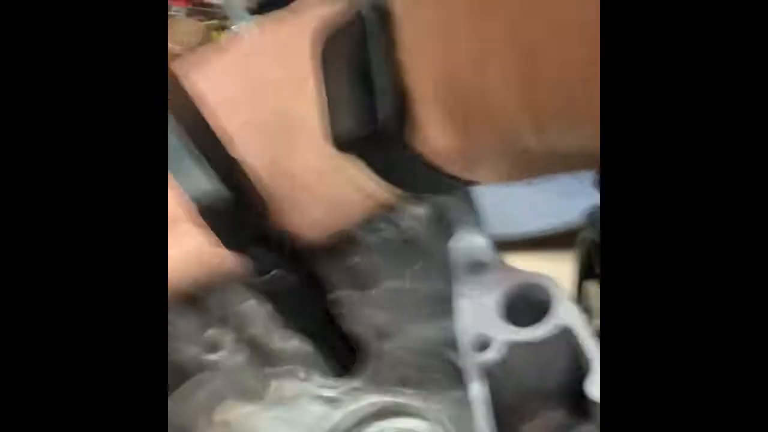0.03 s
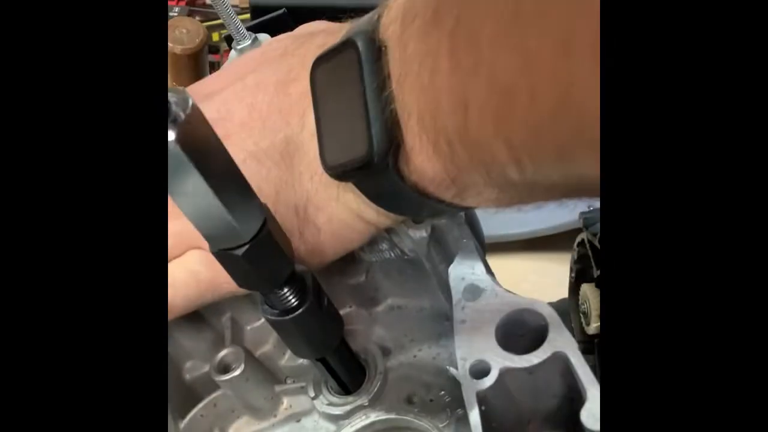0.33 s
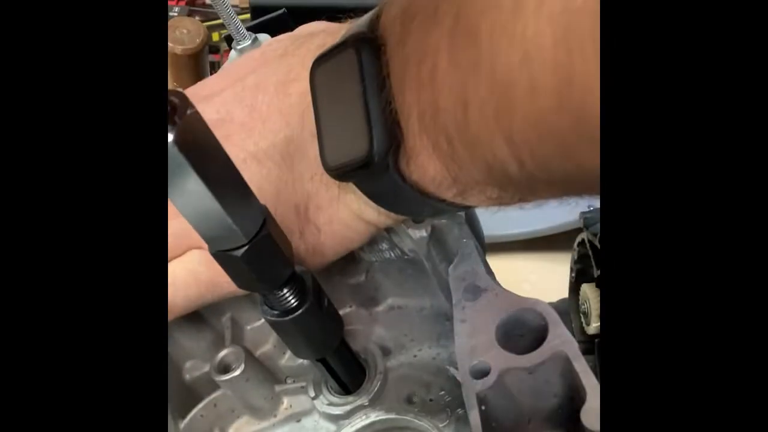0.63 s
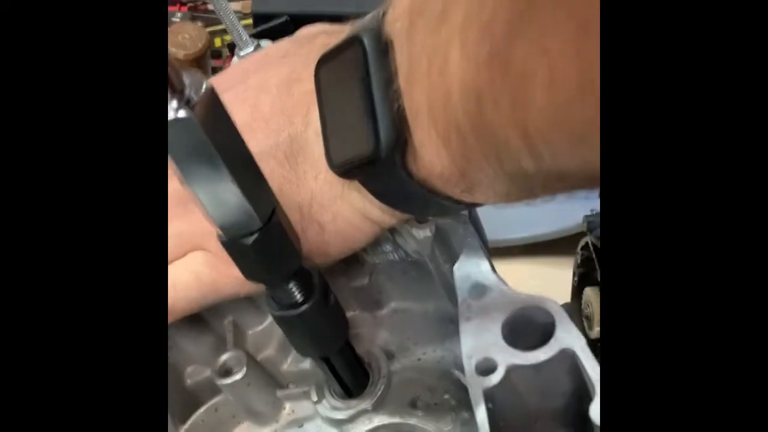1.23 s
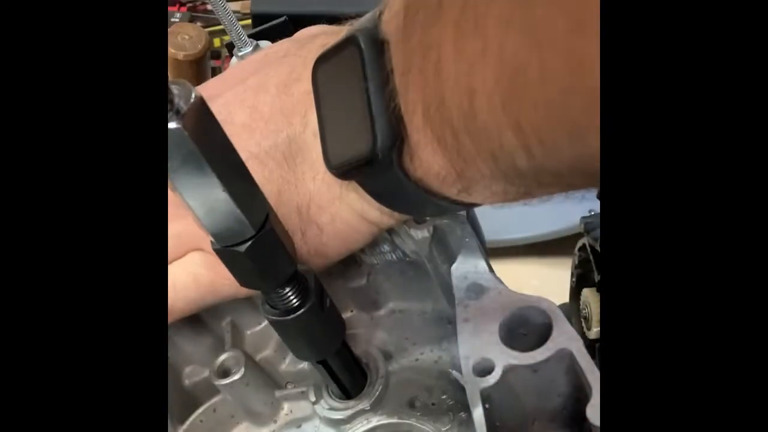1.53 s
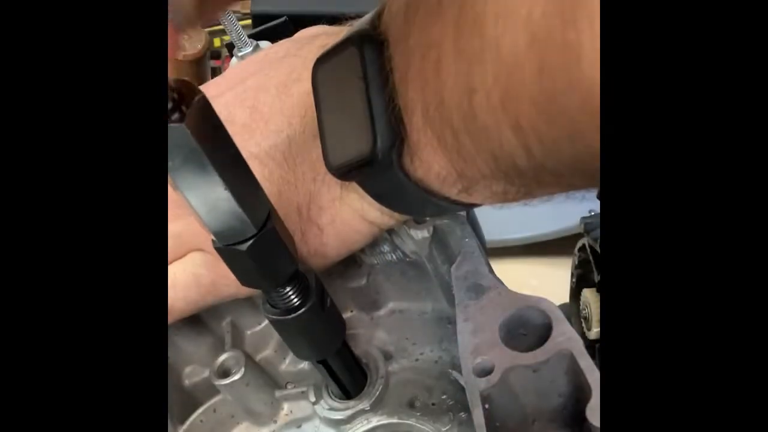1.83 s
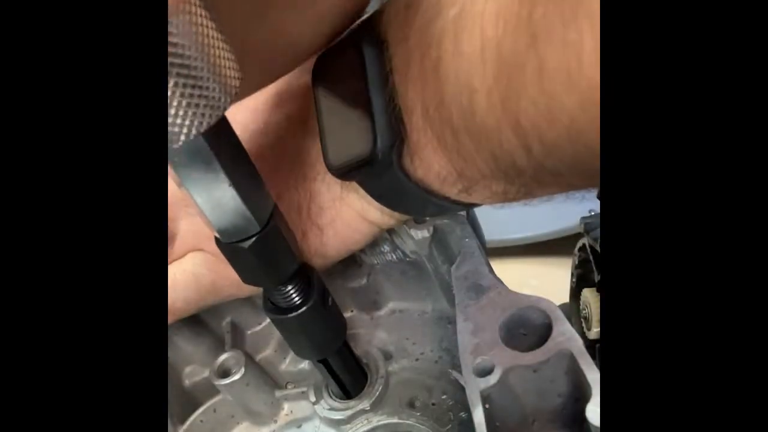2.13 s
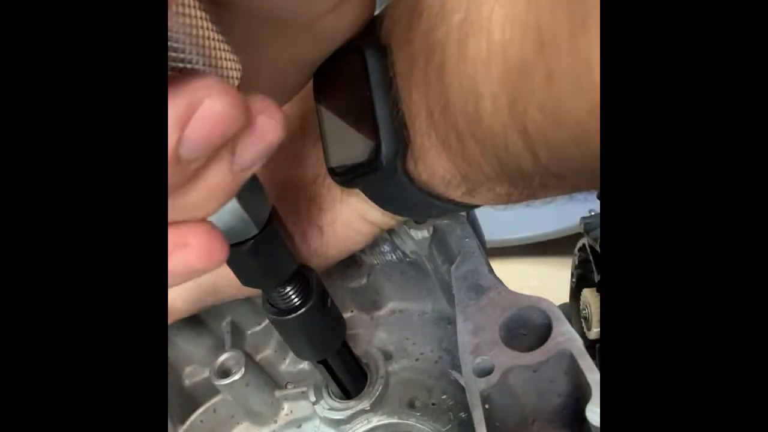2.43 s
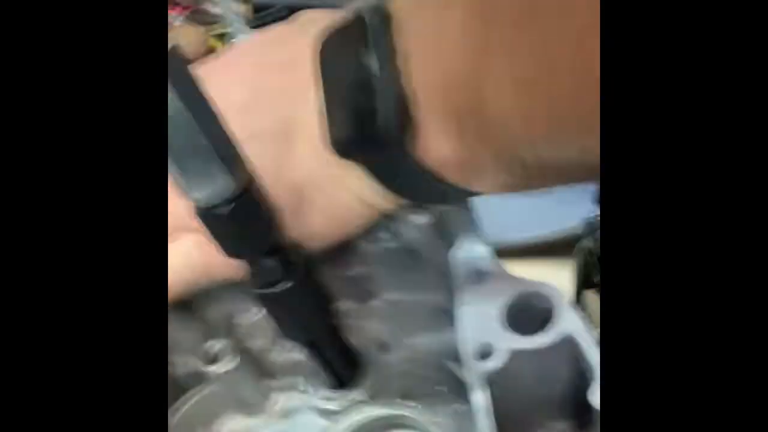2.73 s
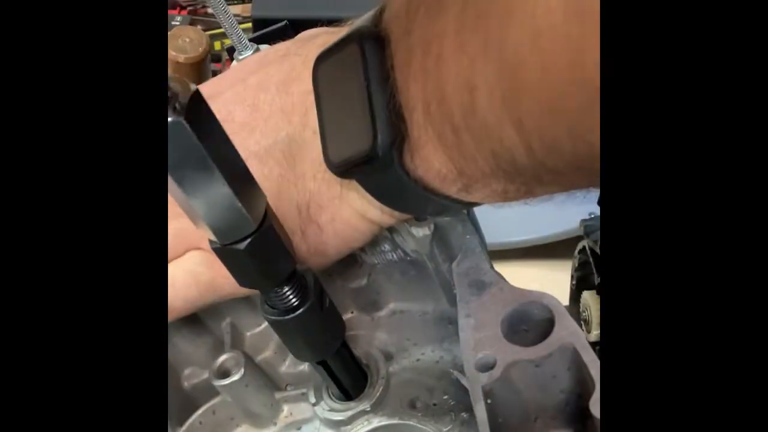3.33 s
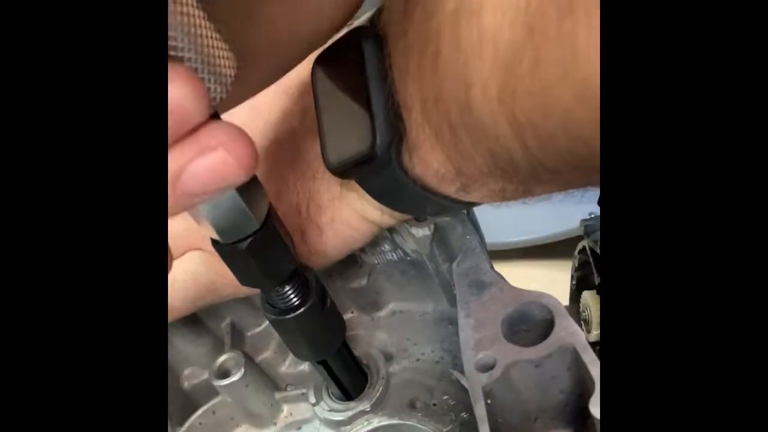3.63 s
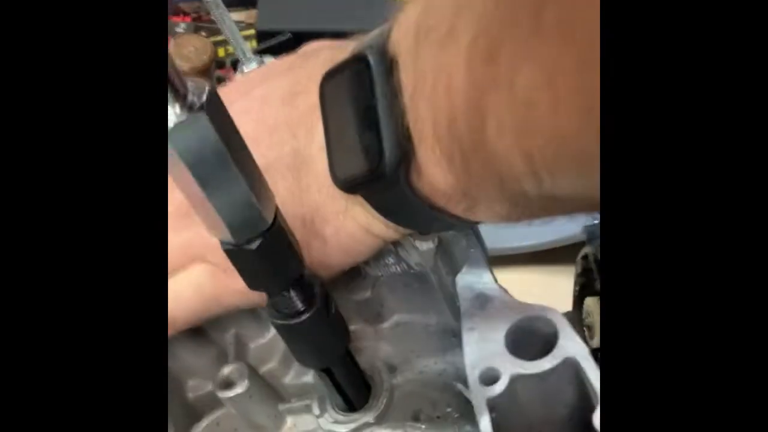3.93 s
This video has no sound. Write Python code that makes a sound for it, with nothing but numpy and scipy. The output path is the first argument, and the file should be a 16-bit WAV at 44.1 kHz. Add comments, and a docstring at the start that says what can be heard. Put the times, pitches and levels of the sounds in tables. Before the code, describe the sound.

Four loud metallic slide hammer blows, with rasping slides and lighter clacks between them.

```python
"""A slide hammer pulls at an aluminium engine case on a garage bench, close to the microphone.
The sound opens on a crash of the steel weight against the stop: the rod rings high, and the case
thuds and rocks on the bench. Then, three times, the weight slides back down with a hollow rasp,
lands with a clack, scrapes up its rod and crashes again.
Faint room noise and a short garage echo lie under it all."""
import sys
import numpy as np
from scipy import signal
from scipy.fft import rfft, irfft
from scipy.io import wavfile
from scipy.ndimage import uniform_filter1d

SR = 44100
rng = np.random.default_rng(int(sys.argv[2]) if len(sys.argv) > 2 else 0)


def unload_audio(sound):
    """Save the sound as a 16-bit wav file, at the path given as the first command line argument."""
    columns = np.transpose(np.atleast_2d(sound))
    # keep every value between -1 and 1, then stretch to whole-number steps
    steps = np.round(np.clip(columns, -1, 1) * 32767)
    wavfile.write(sys.argv[1], SR, steps.astype(np.int16))


N = 176400
T, HZ = np.arange(N) / SR, np.fft.rfftfreq(N, 1 / SR)

# how alike the two microphone openings hear a sound: f/Hz, likeness/0-1, left lead/rad
STEREO = [(60, 0.89, -0.43), (399.4, 0.86, -0.37), (830, 0.78, -0.15), (1990, 0.37, -1.6), (3900, 0, -1.6),
          (8000, 0.9, -0.57), (12000, 0.9, -0.5), (15000, 0.9, 0.49)]
# steady room noise: f/Hz, level/dB
ROOM_SPECTRUM = [(18, -44), (30, -14), (75, 1.5), (125, -4), (167, -7.5), (222, -12.5), (774, -36.5),
                 (15000, -44)]
# the garage's echo: f/Hz, time to fade by 60 dB/s
ECHO_TIMES = [(60, 0.62), (250, 0.6), (1000, 0.2), (4000, 0.45), (15000, 0.18)]
# path of a thin squeak: t/s, f/Hz, level/dB
SQUEAK_PATH = [(1.771, 10000, -91), (1.878, 11500, -76), (2.002, 13400, -87.5), (2.17, 11380, -76),
               (2.259, 10100, -80.5)]
# hands change grip and the case settles: t/s, level/dB, rise/s, fall/s
NUDGES = [(0.11, -34, 0.002, 0.014), (0.223, -46, 0.046, 0.026), (1.248, -54.5, 0.016, 0.1),
          (2.161, -42, 0.013, 0.016), (2.323, -49.5, 0.0079, 0.024), (2.97, -52, 0.023, 0.039)]
# tone of a nudge: f/Hz, level/dB
NUDGE_SPECTRUM = [(50, 0.5), (130, -2.5), (300, 1.5), (600, -0.5), (950, 3.5), (1350, -7.5), (1900, -22),
                  (2500, -10.5), (4200, -27.5), (12000, -36.5)]
# the weight taps rod and handle: t/s, level/dB, fall/s, treble tilt/dB per octave
CLICKS = [(.003, -20.5, 0.0022, 7.5), (.394, -40.5, 0.022, -2.5), (.504, -40, 0.0065, 1.5),
          (2.1508, -46, 0.0061, -2), (2.311, -63, 0.0081, -3), (2.7343, -28.5, 0.003, 7)]
# tone of a tap: f/Hz, level/dB
CLICK_SPECTRUM = [(29, -39), (50, -6.5), (258, -4), (520, -12.5), (863, 0), (1120, -15), (1300, -4),
                  (2160, -9), (3580, -3.5), (7210, -9), (7950, -15), (12000, -11.5), (16000, -31)]
# the weight slides down, one list a slide: t/s, hollow level/dB, rasp level/dB, hollow f/Hz
SLIDES = [
    [(0.5, -66, -49, 820), (0.572, -63, -54.5, 883), (0.61, -47, -49, 905), (0.656, -80, -62.5, 886),
     (0.692, -47, -56.5, 853), (0.708, -56, -60.5, 883), (0.792, -56, -66, 884), (0.82, -67, -58, 890)],
    [(1.39, -70, -68.5, 758), (1.484, -57.5, -54, 855), (1.58, -70, -51.5, 786), (1.66, -67.5, -55.5, 1020),
     (1.832, -43.5, -60.5, 890), (1.904, -56, -66, 874), (1.948, -40, -60, 904), (1.99, -52.5, -69, 880)],
    [(3.09, -73, -54, 772), (3.12, -55, -51, 766), (3.272, -62, -55, 788), (3.374, -57, -51, 895),
     (3.422, -60.5, -56.5, 920), (3.486, -49.5, -49.5, 850), (3.52, -53, -64, 845),
     (3.545, -41.5, -54, 891)],
]
# hollow resonances of a slide: multiple of the pitch, half width/Hz, level/dB
HOLLOW_TONES = [(1.0, 56.1, 1.5), (1.42, 60, -12)]
# higher resonances of a slide: f/Hz, width/Hz, level/dB
SQUEALS = [(1825, 180, -9), (2593, 480, -2), (5300, 400, -12)]
# tone of the sliding friction: f/Hz, level/dB
RASP_SPECTRUM = [(150, -21.5), (280, -2.5), (450, -18.5), (800, -5.5), (1100, -15.5), (1280, 3),
                 (1500, -20.5), (2650, -2.5), (3150, -17.5), (3800, -7), (6700, -25), (7500, -11.5),
                 (8800, -30.5), (10000, -17.5), (14000, -38)]
# the weight lands: t/s, level/dB
LANDINGS = [(0.8372, -29.5), (2.0078, -32.5), (3.5651, -30.5)]
# notes of the case when the weight lands: f/Hz, level/dB
KNOCK_TONES = [(215, -13.5), (660, -20.5), (885, -13), (1320, -14), (2315, -20)]
# the weight is pulled up or bounces back: t/s, level/dB, rise/s, fall/s, extra rod ring/dB
SCRAPES = [(0.225, -38, 0.08, 0.094, 0.5), (0.617, -63, 0.0079, 0.021, 9), (0.982, -37, 0.0061, 0.032, -26),
           (1.222, -36.5, 0.061, 0.038, 2), (2.702, -39, 0.0066, 0.02, -27), (2.956, -36, 0.052, 0.025, 2),
           (3.765, -36.5, 0.0095, 0.027, -37), (3.995, -38, 0.042, 0.058, -3)]
# tone of a scrape: f/Hz, level/dB
SCRAPE_SPECTRUM = [(88, -26.5), (150, -1.5), (611, -11.5), (860, -1.5), (1190, -18.5), (1770, -2.5),
                   (1940, -12.5), (2180, -10.5), (2630, -9), (3710, 2.5), (5020, -7.5), (6940, -9.5),
                   (7920, -9), (11600, -2.5), (12700, -6.5), (14000, -13.5)]
# the loose weight rattles on the rod: t/s, level/dB, fall/s
RATTLES = [(.1096, -35.5, .008), (0.208, -36, 0.0032), (.2165, -35, .006), (0.322, -49, 0.034),
           (0.485, -44, 0.011), (.608, -48, 0.0052), (1.144, -35, 0.0046), (1.182, -43, .004),
           (1.2226, -40.5, 0.012), (1.3148, -43.5, 0.037), (1.4072, -50, 0.0066), (1.698, -51.5, .012),
           (2.9494, -45, .007), (2.969, -54, 0.0058), (3.062, -45.5, 0.023), (3.376, -48.5, 0.0068)]
# notes of the steel rod and weight: f/Hz, level/dB, time to fade by 60 dB/s
ROD_TONES = [(1357, -15, .25), (2225, -13, .24), (3655, -21, .2), (12818, -20, .35), (14508, -10, .6),
             (15019, -7, .5), (15089, -8, .5), (15154, -3, .6), (15455, -3, .55)]
# the case jolts and drops back on the bench: t/s, level/dB, first f/Hz, last f/Hz, rise/s
THUDS = [(0.0192, -12.5, 497, 64.7, 0.0043), (0.043, -13, 76.4, 51.7, 0.0055),
         (0.0557, -8.5, 160, 43.4, 0.011), (1.04, -14.5, 473, 72.5, 0.0071), (1.07, -10, 162, 44, 0.011),
         (1.116, -19, 92, 48.3, 0.012), (2.7614, -6, 545, 63.7, 0.0059), (2.791, -11, 135, 45.5, 0.013),
         (2.836, -22.5, 92.5, 49.4, 0.012), (3.818, -11.5, 587, 61.5, 0.0055),
         (3.847, -9.5, 155, 41.5, 0.014), (3.892, -16, 94, 45.4, 0.01)]
# the weight hits the stop: t/s, level/dB, rise/s, fall/s, treble tilt/dB per octave
BLOWS = [(0.02, -12.5, 0.0053, 0.007, 1.5), (1.042, -10, 0.0067, 0.0077, 2.5),
         (2.7625, -14, 0.0067, 0.0094, 2), (3.819, -12.5, 0.0059, 0.01, 2.5)]
# tone of the crash: f/Hz, level/dB
CRASH_SPECTRUM = [(200, -1), (380, -2), (560, -9.5), (800, -9), (1200, -12), (1600, -17.5), (2700, -18.5),
                  (4200, -16.5), (6400, -21), (8000, -17), (9400, -32.5), (11900, -21.5), (13400, -35.5),
                  (15100, -25.5), (16000, -25.5)]
# tone of the shudder that follows it: f/Hz, level/dB
SHUDDER_SPECTRUM = [(250, 5.5), (450, -6.5), (750, -6.5), (1300, -9.5), (1850, -14), (2200, -6.5),
                    (3000, -21), (3700, -12.5), (5400, -19), (8000, -16), (12100, -18.5), (13400, -20.5),
                    (16000, -24)]

TAP_RISE_S = 0.0005


def amp(db):
    """Turns decibels into a number to multiply by."""
    return 10 ** (np.asarray(db) / 20)


def evened(x):
    """Scales a signal to an average strength (rms) of 1."""
    return x / np.sqrt(np.mean(x ** 2) + 1e-20)


def read(points, hz, column=1):
    """Looks up a table between its rows, on a log frequency scale."""
    table = np.array(points, float)
    return np.interp(np.log(hz + 1), np.log(table[:, 0] + 1), table[:, column])


def wander(span):
    """A smooth random curve that changes over about span steps."""
    fade = np.exp(-np.minimum((np.fft.rfftfreq(N) * span * 2) ** 2, 50))
    return evened(irfft(rfft(rng.standard_normal(N)) * fade, N))


def noise(gain):
    """Stereo noise with this gain at each frequency, partly alike on the left and right."""
    left, other = rfft(rng.standard_normal((2, N)))
    likeness = read(STEREO, HZ)
    lag = np.exp(-1j * read(STEREO, HZ, column=2))
    right = (likeness * left + np.sqrt(1 - likeness ** 2) * other) * lag
    return evened(irfft(np.array([left, right]) * gain, N))


def colour(spectrum, tilt_db=0):
    """Turns a spectrum table into gains, tilting the treble and fading the deepest bass."""
    bass_cut = HZ ** 2 / (HZ ** 2 + (spectrum[0][0] / 2) ** 2)
    return amp(read(spectrum, HZ) + tilt_db * np.log2((HZ + 200) / 4000)) * bass_cut


def swell(s, rise, fall):
    """A level that grows up to the moment s, then dies away."""
    return np.exp(-np.minimum(np.maximum((s - T) / rise, (T - s) / fall), 40))


def resonate(x, hz, width):
    """Keeps a narrow band of x around the moving pitch hz; two passes make its sides steep."""
    turn = np.exp(2j * np.pi * np.cumsum(hz) / SR)
    decay = np.exp(-np.pi * width / SR)
    for _ in range(2):
        x = 2 * (turn * signal.lfilter([1 - decay], [1, -decay], x / turn)).real
    return evened(x)


def whistle(x, hz, width):
    """A resonance whose pitch wanders a few percent around hz."""
    return resonate(x, hz * (1 + 0.025 * wander(0.02 * SR)), width)


def shifting(x, depth_db=5.5, patch_s=0.017):
    """The contact keeps shifting, so patches of the tone grow louder and softer."""
    bands = signal.stft(x, nperseg=512, noverlap=384)[2]
    patches = uniform_filter1d(rng.standard_normal(bands.shape[1:]), round(patch_s * SR / 128))
    patches = evened(uniform_filter1d(patches, round(patch_s * SR / 128)))
    return evened(signal.istft(bands * amp(depth_db * patches), nperseg=512, noverlap=384)[1][:, :N])


def slips(db, per_s, fall):
    """The level of friction, jumping each time the weight catches."""
    catches = (rng.random(N) < per_s / SR) * rng.random(N) ** 2
    jumps = signal.lfilter([1], [1, -np.exp(-1 / (fall * SR))], catches)
    return evened(1 + amp(db) * jumps)


def room_noise():
    """The faint, steady rumble of the room."""
    return amp(-77) * noise(colour(ROOM_SPECTRUM))


def garage_echo(x, rise_s=0.0099):
    """A short wash of echoes, each band dying at its own speed."""
    hz, t, bands = signal.stft(rng.standard_normal((2, SR)), SR, nperseg=256)
    fade = amp(-60 * t / read(ECHO_TIMES, hz)[:, None])
    tail = signal.istft(bands * fade, SR, nperseg=256)[1][:, :SR]
    tail *= np.minimum(T[:SR] / rise_s, 1)
    return signal.fftconvolve(x, tail / np.linalg.norm(tail[0]), axes=1)[:, :N]


def squeak():
    """A faint thin squeak rises and falls back."""
    s, hz, db = np.transpose(SQUEAK_PATH)
    level = amp(np.interp(T, s, db)) * (T > s[0]) * (T < s[-1])
    return level * resonate(rng.standard_normal(N), np.interp(T, s, hz), width=120)


def nudges(body):
    """Dull bumps as the hands change grip and the case settles."""
    level = sum(amp(db) * swell(s, rise, fall) for s, db, rise, fall in NUDGES)
    return level * noise(body * colour(NUDGE_SPECTRUM))


def clicks(body):
    """The weight taps the rod and handle, each time a short burst of noise."""
    return sum(amp(db) * swell(s, TAP_RISE_S, fall) * noise(body * colour(CLICK_SPECTRUM, tilt_db))
               for s, db, fall, tilt_db in CLICKS)


def slides(body, sing_from_db=-56, sing_range_db=16, waver_hz=12, rumble_hz=110):
    """The returning weight rasps along the rod; its hollow resonances drift upward."""
    sliding = sum(1. * ((T > slide[0][0]) & (T < slide[-1][0])) for slide in SLIDES)
    gate = uniform_filter1d(sliding, size=800)
    rows = np.vstack(SLIDES)
    tone_db, rasp_db, hz = (np.interp(T, rows[:, 0], column) for column in rows.T[1:])
    drive = noise(body)
    hollow = sum(amp(db) * whistle(drive, k * hz, 2 * half_width) for k, half_width, db in HOLLOW_TONES)
    pitch = hz + waver_hz * wander(0.0043 * SR)
    note = evened(np.sin(2 * np.pi * np.cumsum(pitch) / SR))
    sing = np.clip((tone_db - sing_from_db) / sing_range_db, 0, 1)  # a loud tone narrows to one note
    tone = (1 - sing) * hollow + sing * note
    squeal = sum(amp(db) * whistle(drive, centre, width) for centre, width, db in SQUEALS)
    friction = shifting(noise(body * colour(RASP_SPECTRUM)))
    rasp = (friction + squeal) * slips(db=8, per_s=8.2, fall=0.018)
    rumble = noise(HZ / rumble_hz / (1 + (HZ / rumble_hz) ** 3))
    return gate * (amp(tone_db + 0.5) * tone + amp(rasp_db) * rasp + amp(-74.5) * rumble)


def landings(body, rise=0.00069):
    """The weight brushes the lower stop, clacks home and knocks the case."""
    out = np.zeros((2, N))
    for s, db in LANDINGS:
        brush = amp(-17.5) * swell(s, rise=0.0072, fall=0.026)
        clack = swell(s, rise, fall=0.0062)
        tones = sum(amp(level) * np.sin(2 * np.pi * (hz * T + rng.random())) for hz, level in KNOCK_TONES)
        knock = swell(s, rise, fall=0.014) * tones
        out += amp(db) * ((brush + clack) * noise(body * colour(CLICK_SPECTRUM)) + knock)
    return out


def scrapes(body):
    """Steel rubs on steel in tiny bounces, and the loose weight rattles."""
    rub = sum(amp(db) * swell(s, rise, fall) for s, db, rise, fall, _ in SCRAPES)
    chatter = slips(db=8, per_s=100, fall=0.0012)
    rattle = sum(amp(db) * swell(s, TAP_RISE_S, fall) for s, db, fall in RATTLES)
    return np.hypot(rub * chatter, rattle) * shifting(noise(body * colour(SCRAPE_SPECTRUM)))


def rod_ring(blow_db=-17, scrape_db=-32.5, rise_s=0.012):
    """Blows and scrapes set the rod ringing; each of its notes swells in and fades."""
    struck = sum(amp(db + blow_db) * (np.arange(N) == round(s * SR)) for s, db, *_ in BLOWS)
    rubbed = sum(amp(db + ring_db + scrape_db) * swell(s, rise, fall)
                 for s, db, rise, fall, ring_db in SCRAPES)
    force = struck + rubbed * rng.standard_normal(N)
    t, out = T[:SR], np.zeros((2, N))
    for hz, db, fade_s in ROD_TONES:
        ring = amp(db - 60 * t / fade_s) * (1 - np.exp(-t / rise_s)) * np.exp(2j * np.pi * hz * t)
        flutter = evened(amp(0.5 * wander(0.014 * SR)))  # the loose weight damps the ring unevenly
        left = signal.fftconvolve(force, ring)[:N] * flutter
        right = left * np.exp(-1j * read(STEREO, hz, column=2))
        out += [left.real, right.real]
    return out


def thuds():
    """Each jolt of the case on the bench is a few low swings that sag in pitch."""
    out = np.zeros((2, N))
    for s, db, first_hz, last_hz, rise in THUDS:
        t, sag_s = np.maximum(T - s, 0), 0.7 * rise
        turns = last_hz * t + (first_hz - last_hz) * sag_s * (1 - np.exp(-np.minimum(t / sag_s, 50)))
        shape = (t / rise * np.exp(1 - np.minimum(t / rise, 50))) ** 2
        lag = np.array([[0], [read(STEREO, last_hz, column=2)]])
        out += amp(db) * shape * np.sin(2 * np.pi * turns - lag)
    return out


def blows(body):
    """The weight crashes into the stop with a sharp crack, and the metal shudders briefly."""
    out = np.zeros((2, N))
    for s, db, rise, fall, tilt_db in BLOWS:
        crack = amp(2) * swell(s, rise=0.00005, fall=0.0005)
        out += amp(db) * (swell(s, rise, fall) + crack) * noise(body * colour(CRASH_SPECTRUM, tilt_db))
    shudder = sum(amp(db - 14.5) * swell(s, rise, fall=0.048) for s, db, rise, *_ in BLOWS)
    return out + shudder * shifting(noise(body * colour(SHUDDER_SPECTRUM)))


def scene():
    """Mixes the metal sounds and thuds with their echoes and the room noise."""
    ripple_db, spacing_hz = 4 * HZ / (HZ + 590), 65
    # the case's many close resonances colour the metal noises, less so in the bass
    body = amp(ripple_db * wander(spacing_hz * N / SR)[:len(HZ)])
    metal = blows(body) + rod_ring() + clicks(body) + nudges(body)
    metal += scrapes(body) + slides(body) + landings(body) + squeak()
    low = thuds()
    echo = amp(-25.5) * garage_echo(low)[:1] + amp(-15.5) * garage_echo(metal)
    return metal + low + echo + room_noise()


def record(dry):
    """Clips peaks at full scale, then cuts the very highest treble."""
    low_pass = signal.firwin(255, cutoff=15900, window=("kaiser", 8), fs=SR)
    return signal.oaconvolve(np.clip(dry, -1, 1), low_pass[None], "same", axes=1)


dry = scene()
out = record(dry)
unload_audio(out)
```